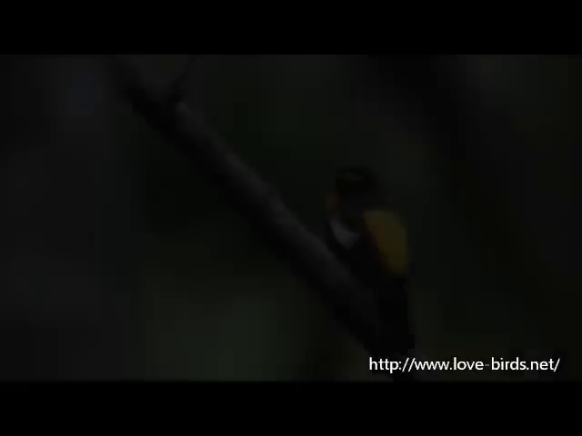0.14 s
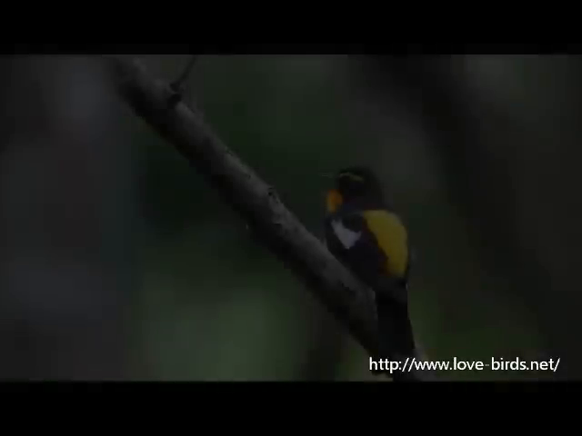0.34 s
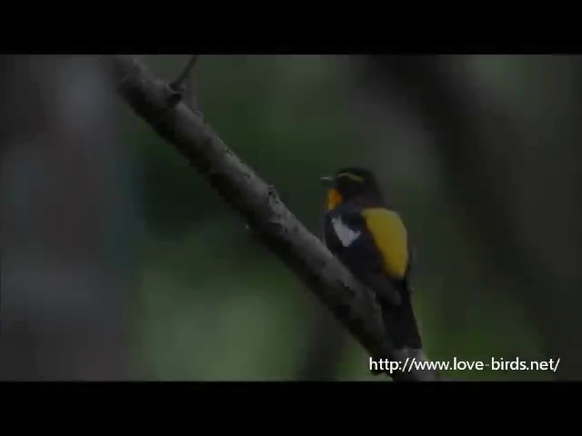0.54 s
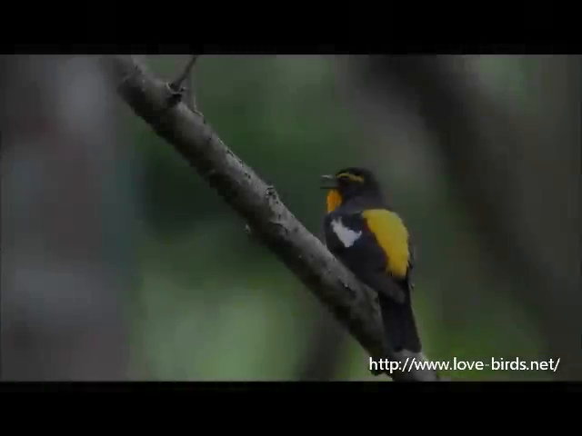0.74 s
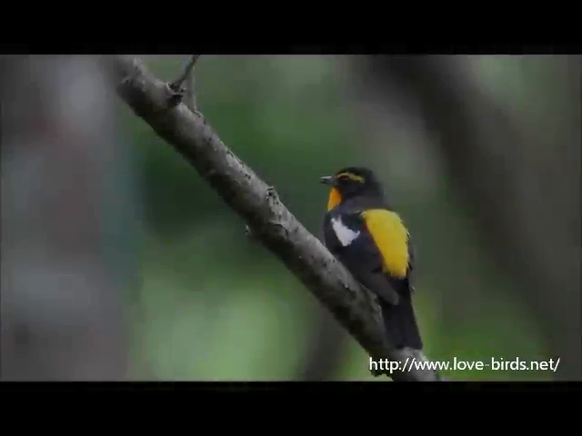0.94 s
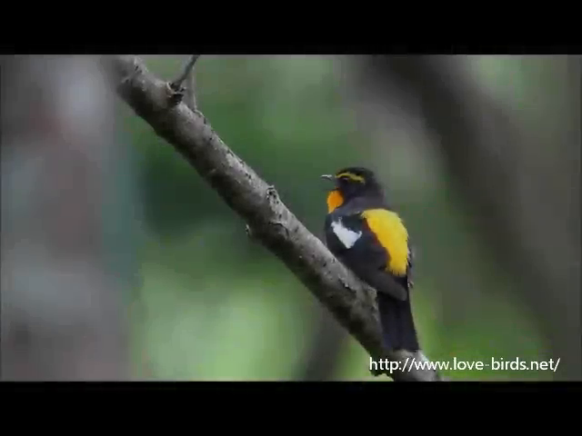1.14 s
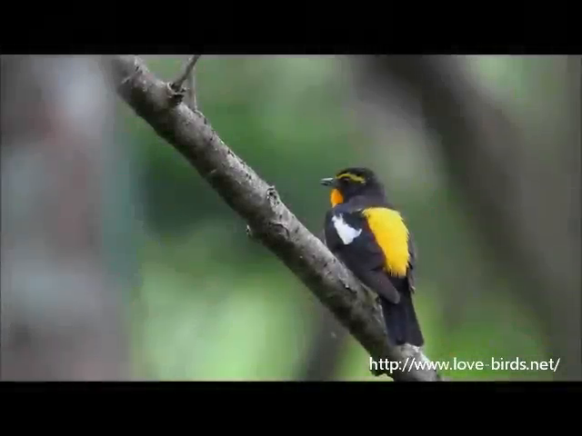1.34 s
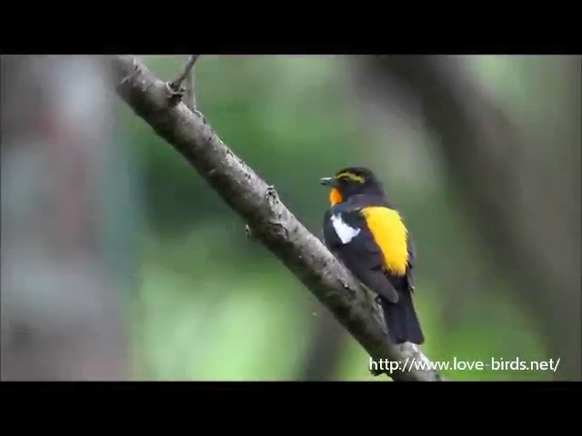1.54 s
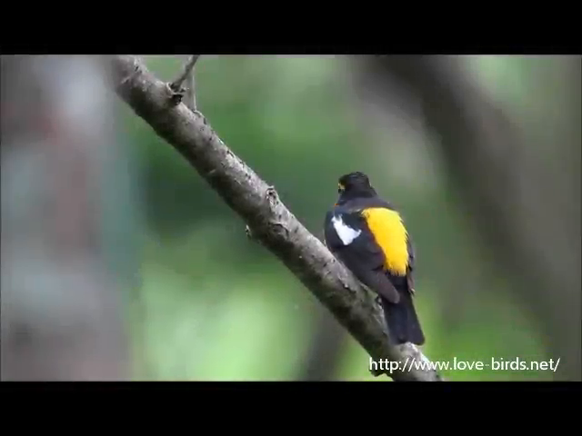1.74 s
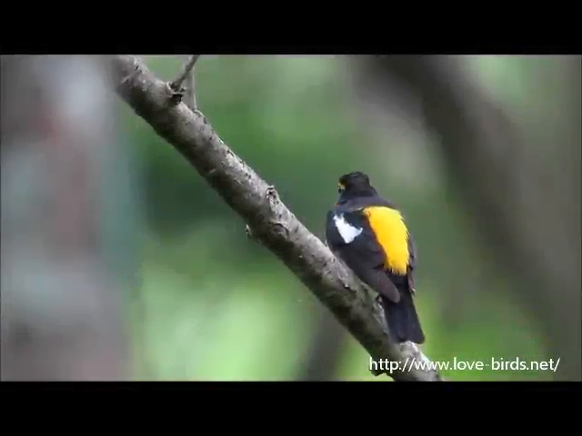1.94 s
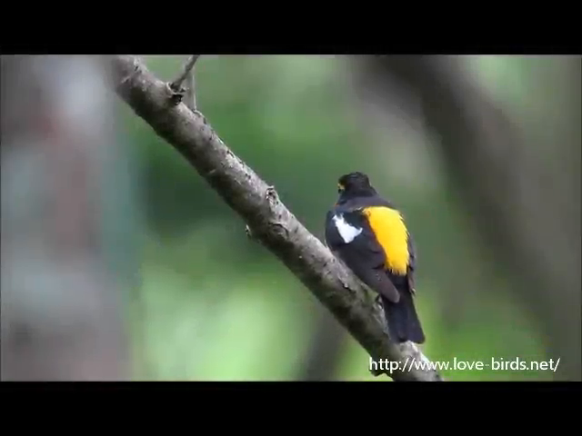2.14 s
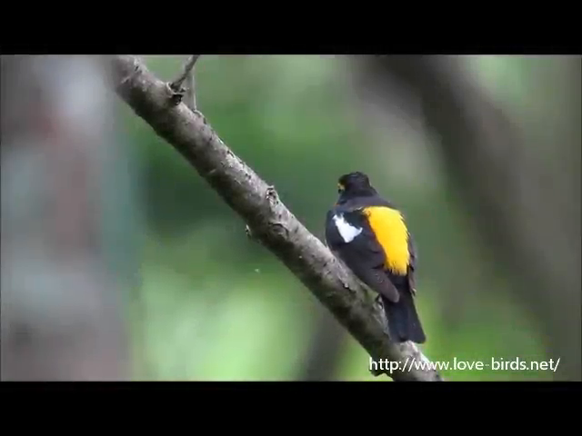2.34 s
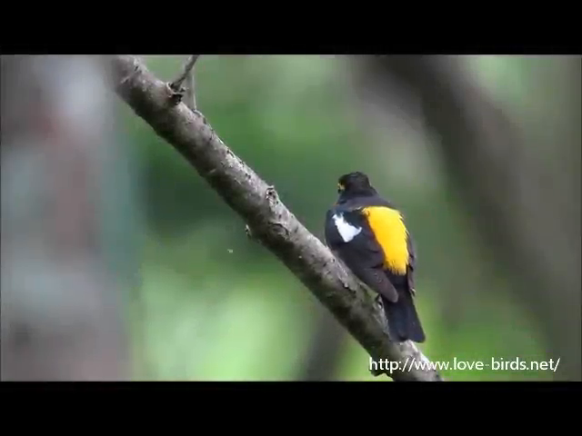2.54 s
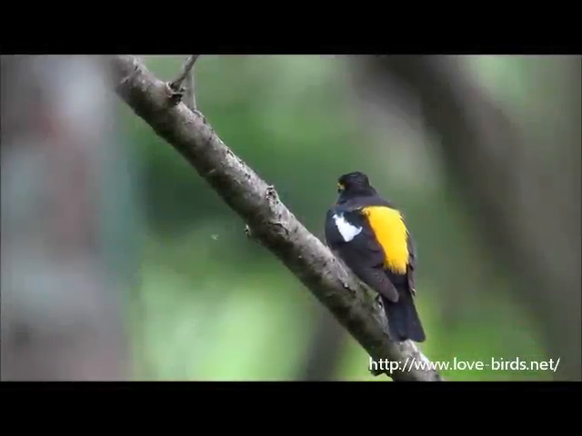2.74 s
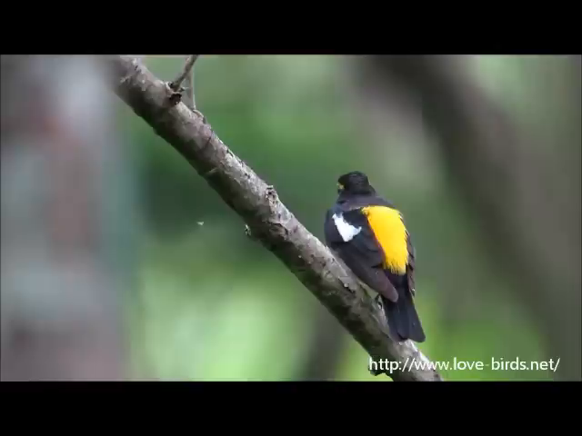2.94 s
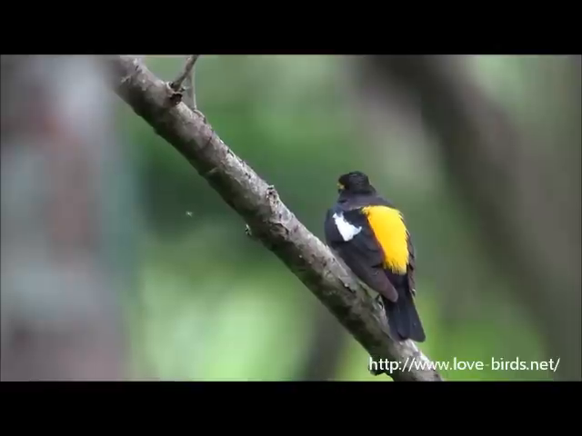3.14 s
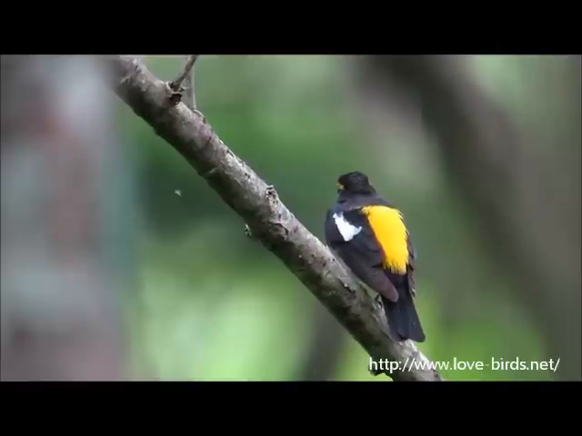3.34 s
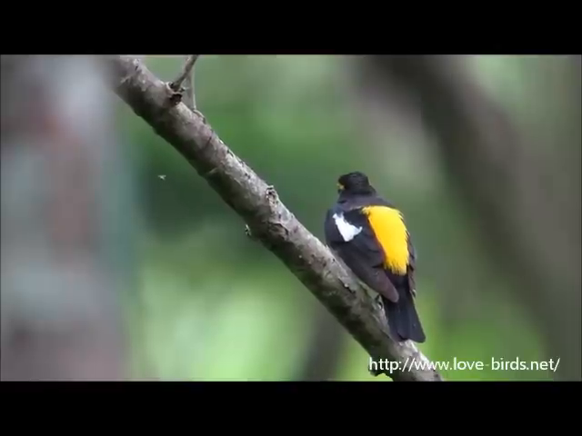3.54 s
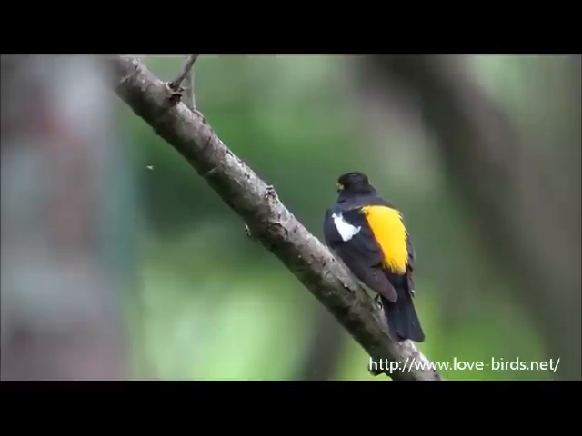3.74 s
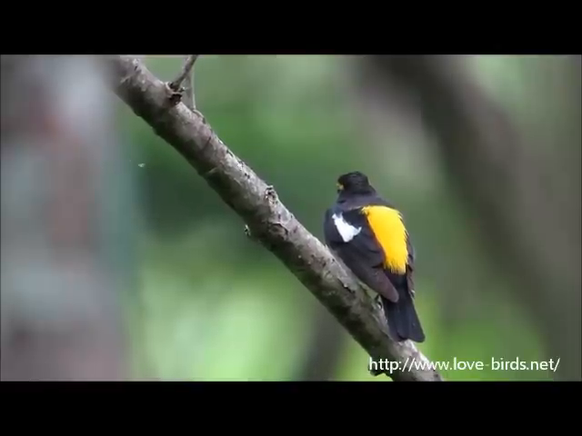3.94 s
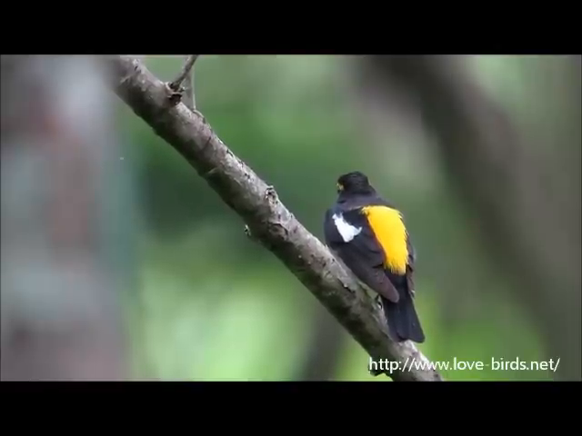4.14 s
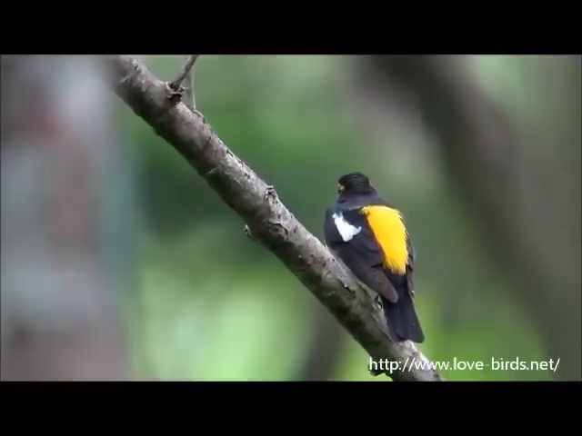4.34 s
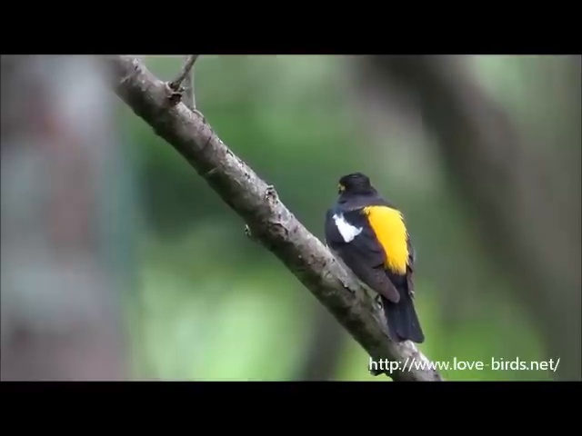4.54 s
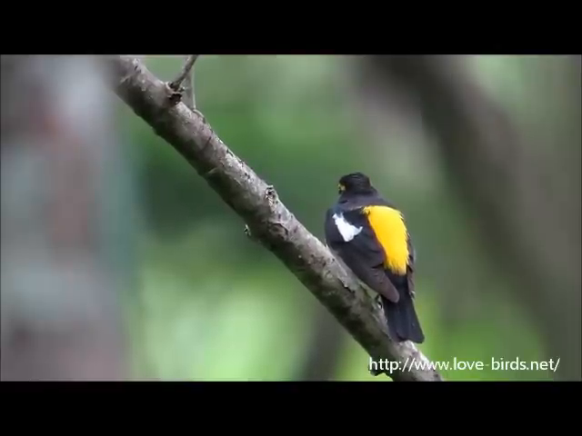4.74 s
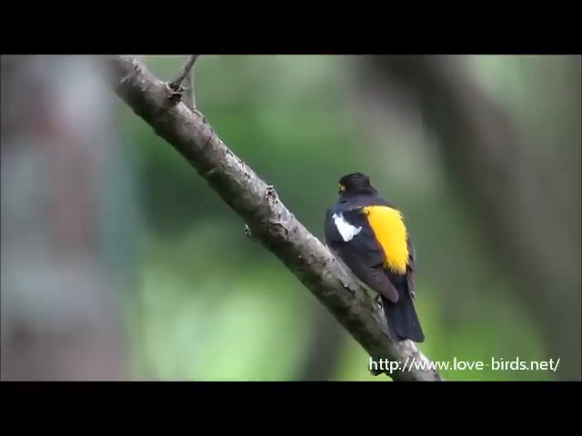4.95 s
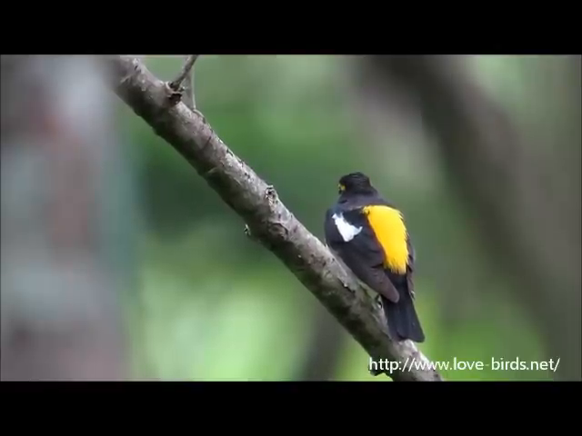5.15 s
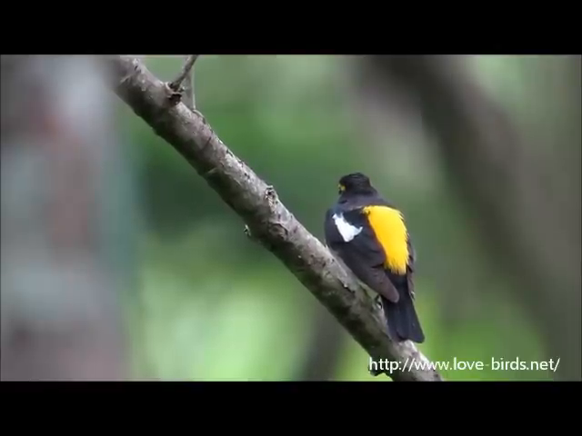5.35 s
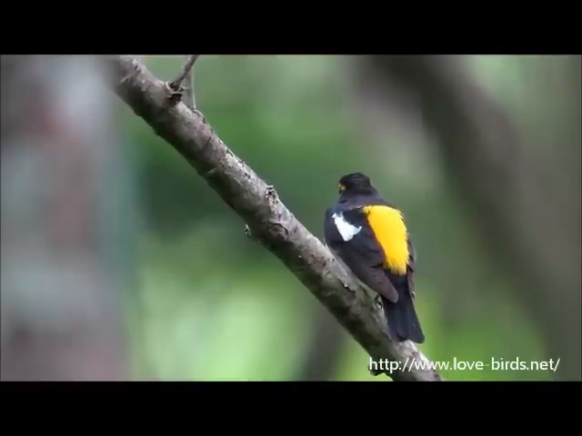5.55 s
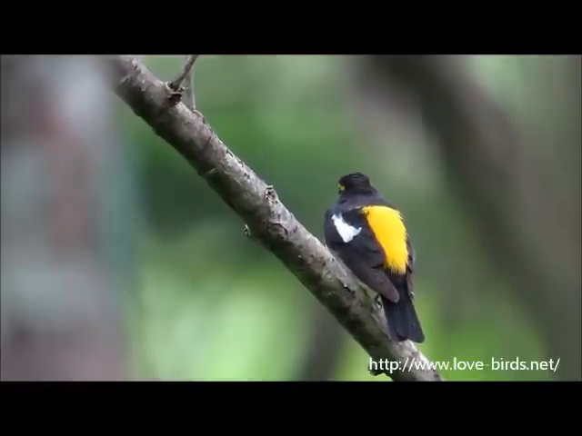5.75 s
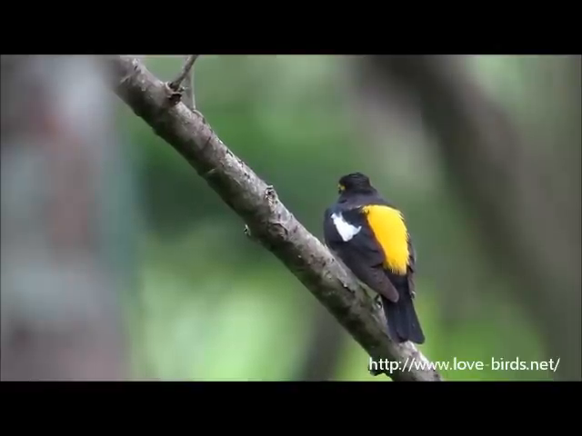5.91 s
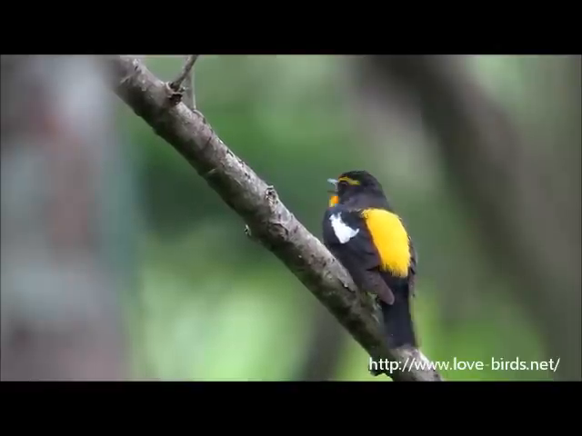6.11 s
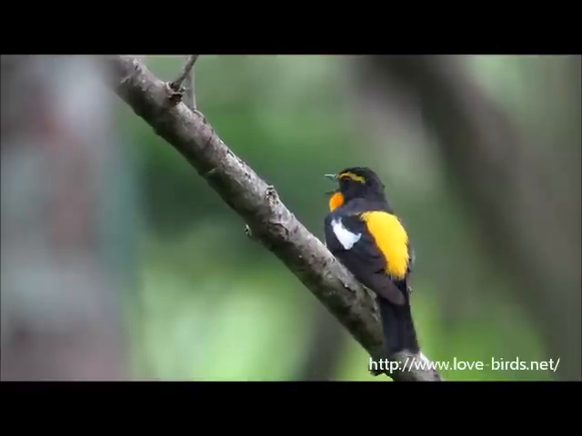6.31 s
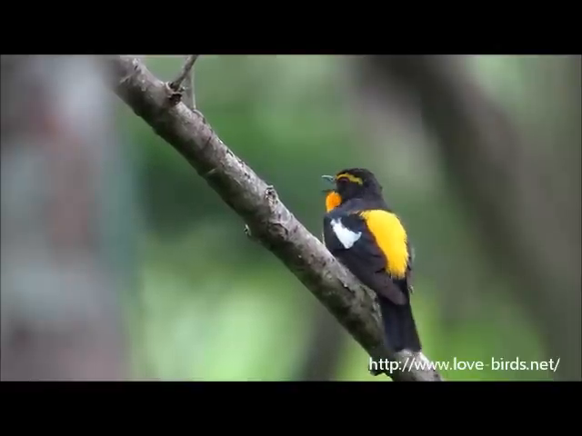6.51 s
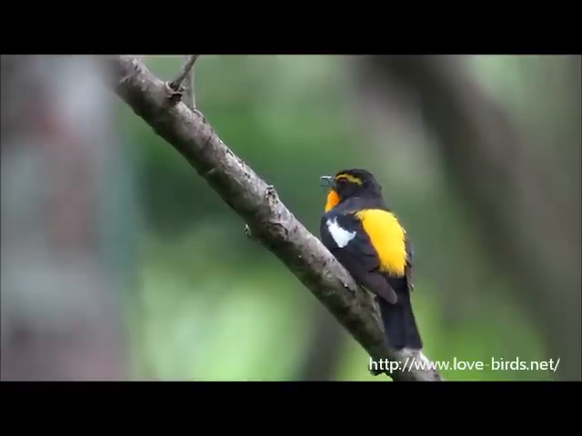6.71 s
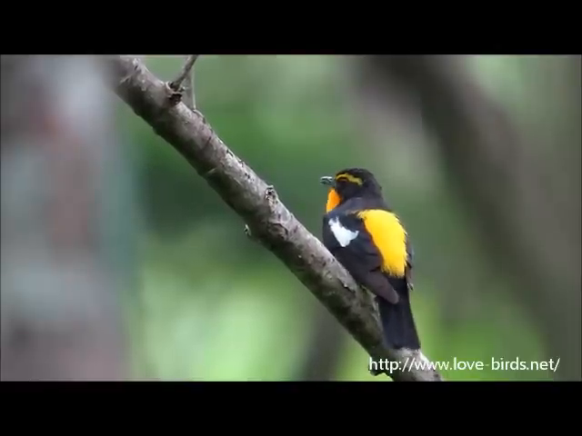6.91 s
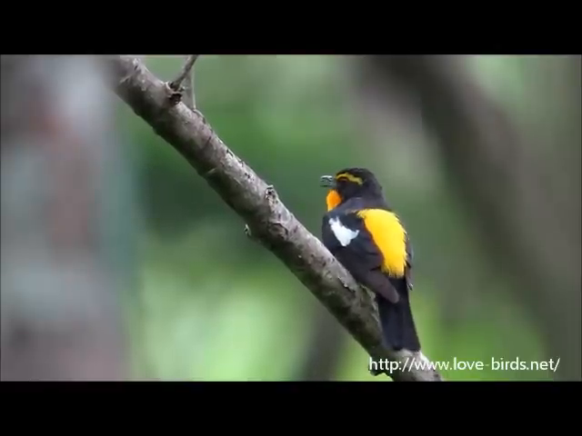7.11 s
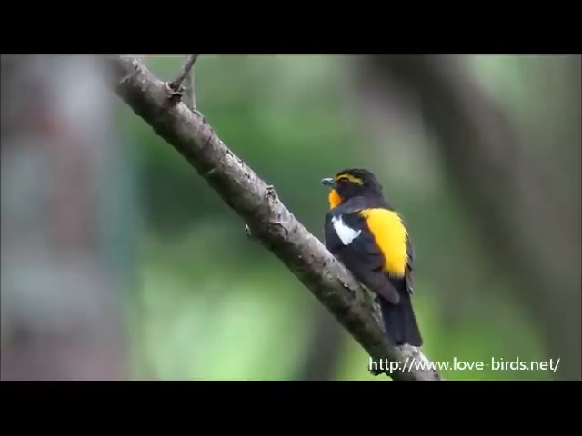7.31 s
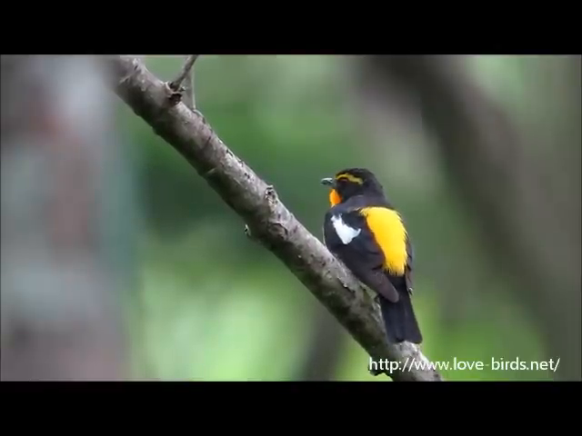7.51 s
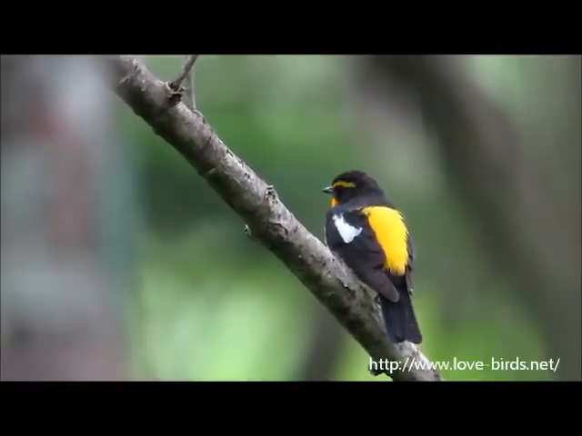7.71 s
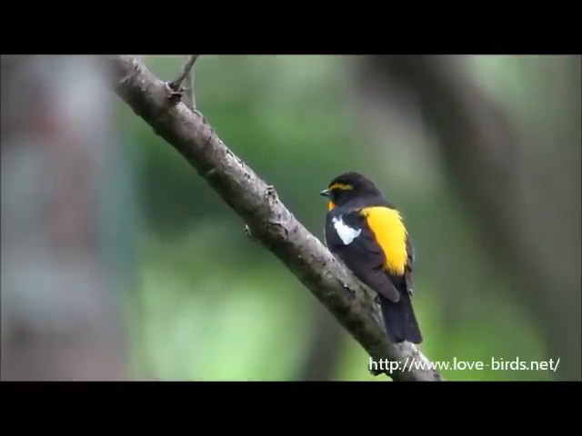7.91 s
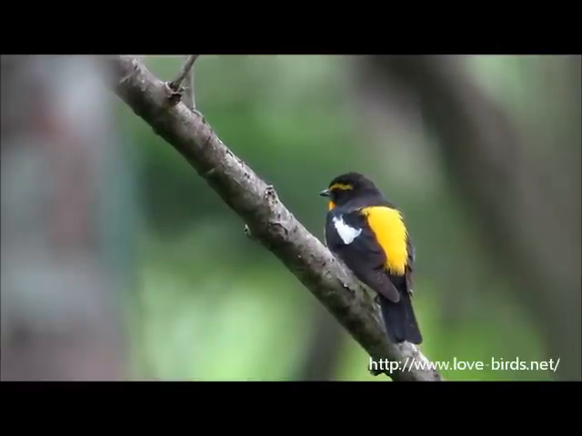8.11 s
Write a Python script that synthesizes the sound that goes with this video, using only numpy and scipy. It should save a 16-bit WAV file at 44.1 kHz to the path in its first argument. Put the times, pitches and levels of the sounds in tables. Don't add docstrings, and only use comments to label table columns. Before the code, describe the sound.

A nearby songbird sings short buzzy notes and arched whistles in an echoing forest, with fainter birds answering over soft leaf hush and a distant drone.

```python
import sys
import numpy as np
from scipy import signal
from scipy.fft import rfft, irfft, next_fast_len
from scipy.io import wavfile
from scipy.ndimage import uniform_filter1d

SR = 44100
rng = np.random.default_rng(int(sys.argv[2]) if len(sys.argv) > 2 else 0)


def file_out(sig):
    cols = np.atleast_2d(sig).T
    lim = np.clip(cols, -1, 1)
    pcm = np.round(lim * 32767).astype(np.int16)
    wavfile.write(sys.argv[1], SR, pcm)


def amp(db):
    return 10 ** (np.asarray(db, float) / 20)


N = 364707
TAIL = 3 * SR // 2


def read(points, at):
    x, value = np.transpose(points)
    return np.interp(at, x, value)


def read_hz(points, hz):
    f, value = np.transpose(points)
    return np.interp(np.log(hz + 1), np.log(f + 1), value)


def evened(x):
    return x / np.sqrt(np.mean(x ** 2) + 1e-20)


def add(mix, start_s, sound):
    part = mix[..., round(start_s * SR):][..., :sound.shape[-1]]
    part += sound[..., :part.shape[-1]]


def sides(pan_db):
    return amp(np.array([[pan_db / 2], [-pan_db / 2]]))


def fuzzy_tone(hz, width_hz):
    r = np.exp(-np.pi * width_hz / SR)
    noise = rng.standard_normal((2, N)) + 1j * rng.standard_normal((2, N))
    slow = signal.lfilter([1], [1, -2 * r, r * r], noise)
    turn = 2 * np.pi * np.cumsum(hz * np.ones(N)) / SR
    return evened((slow * np.exp(1j * turn)).real)


# frequency in Hz, level in dB per Hz.
HUSH_TONE = [(12, -30), (20, -6), (59, 2.5), (149, -4.5), (232, -1.5), (307, -6), (417, -7), (1680, -15),
             (2770, -11.5), (3280, -12.5), (4330, -10.5), (6950, -27.5), (7990, -30), (8680, -26),
             (15600, -28.5)]
# frequency in Hz, likeness from 0 to 1.
LEFT_RIGHT_LIKENESS = [(40, .45), (150, .35), (400, .4), (800, .25), (1500, .07), (15000, .1)]
# time in seconds, level in dB.
CHORUS_SWELL = [(0, -3.5), (1, -1.5), (2, -1.3), (3.2, 0.8), (4.2, 0), (5.3, -0.1), (5.8, -2), (6.3, -3.5),
                (7, 2.3), (7.7, -0.1), (8.3, -1.7)]


def hush():
    frames, hz = N // 256 + 5, np.fft.rfftfreq(1024, 1 / SR)
    a, b, c, d, patches = rng.standard_normal((frames, 513, 5)).T
    patches = uniform_filter1d(patches, size=8, axis=0)
    patches = evened(uniform_filter1d(patches, size=24, axis=1))
    patchy_db = read_hz([(300, 2.4), (1500, .8), (3000, 2.1), (7000, 1.6), (9000, 0.66)], hz)[:, None]
    chorus_band = ((hz > 2100) & (hz < 5200))[:, None]
    chorus_db = chorus_band * read(CHORUS_SWELL, np.arange(frames) * 256 / SR)
    same = np.clip(read_hz(LEFT_RIGHT_LIKENESS, hz), -1, 1)[:, None]
    left = a + 1j * b
    right = same * left + np.sqrt(1 - same ** 2) * (c + 1j * d)
    z = np.array([left, right])
    z *= amp(read_hz(HUSH_TONE, hz)[:, None] + patchy_db * patches + chorus_db)
    return amp(-51.5) * evened(signal.istft(z, nperseg=1024, noverlap=768)[1][:, :N])


# time in seconds, pitch in Hz, level in dB.
AIRCRAFT = [(0, 320, -69.5), (2.601, 302, -61), (3.699, 265, -61.5), (4.299, 238, -74), (5.798, 222, -63.5),
            (8.3, 200, -57.5)]


def drone():
    s, hz, level_db = np.transpose(AIRCRAFT)
    t = np.arange(N) / SR
    pitch = np.interp(t, s, hz)
    blades = fuzzy_tone(pitch, 30)
    octave = amp(-5) * fuzzy_tone(2 * pitch, 79)
    return amp(np.interp(t, s, level_db)) * (blades + octave)


# frequency in Hz, width in Hz, level in dB.
ELECTRONIC_WHINES = [
    (8794, 40, -65.5),
    (15700, 15, -110),
]


def whines():
    return sum(amp(db) * fuzzy_tone(hz, width_hz) for hz, width_hz, db in ELECTRONIC_WHINES)


# start in seconds, peak in dB, left-right difference in dB.
CAMERA_TICKS = [(0.2394, -85, 1.0), (0.3674, -75, -0.5), (0.882, -54, -11), (1.0346, -63, -2.5),
                (1.263, -47, -8), (1.4207, -55, -2.0), (1.644, -48, -10), (1.8, -54, -2.5),
                (2.0552, -49, -6), (2.2134, -55, -3.5), (2.4349, -47, -8), (2.5933, -52, -6),
                (2.7356, -58, -6), (2.7615, -46, -8), (2.8215, -54, -5), (4.5326, -44, 2)]


def ticks():
    out, t = np.zeros((2, N)), np.arange(2200) / SR
    bright = signal.butter(1, (5000, 12500), "band", fs=SR, output="sos")
    noises = rng.standard_normal((len(CAMERA_TICKS), 2, 2200))
    for (s, peak_db, pan_db), noise in zip(CAMERA_TICKS, noises):
        burst = signal.sosfilt(bright, noise[0] + 0.44 * noise)
        add(out, s, sides(pan_db) * amp(peak_db + 0.5 - 60 * t / 0.022) * burst)
    return out


def whistle(depth_hz, rows, overtone_db, waver):
    s, hz, level_db = np.transpose(rows)
    t = np.arange(s[0], s[-1], 1 / SR)
    drift, flutter = evened(uniform_filter1d(rng.standard_normal((2, SR)), size=400))[:, :len(t)]
    warble_hz = max(75, .25 * depth_hz)
    swing = np.sin(2 * np.pi * np.cumsum(warble_hz * (1 + 0.1215 * drift)) / SR)
    glide = uniform_filter1d(np.interp(t, s, hz), size=200, mode="nearest")
    pitch = glide * (1 + waver * drift) + depth_hz * swing
    turn = 2 * np.pi * np.cumsum(pitch) / SR
    edge = np.clip(np.minimum(t - s[0], s[-1] - t) / 0.0042, 0, 1)
    gain = np.sqrt(2) * amp(np.interp(t, s, level_db) + 1.74 * flutter) * edge
    overtones = amp(overtone_db) * np.sin(2 * turn) + amp(overtone_db + 2) * np.sin(3 * turn)
    return gain * (np.sin(turn) + overtones)


# frequency in Hz, time to fall by 60 dB in seconds.
ECHO_TIME = [(2000, 0.57), (3500, 0.55), (5000, 0.47), (8000, 0.65)]


def forest(build_s):
    taps = np.zeros((3, 2, TAIL))
    at = np.arange(40, TAIL - 20, 20) + rng.integers(0, 20, (3, 2, (TAIL - 41) // 20))
    np.put_along_axis(taps, at, rng.choice([-1., 1.], at.shape), axis=2)
    taps *= 1 - np.exp(-np.arange(TAIL) / SR / build_s)
    hz, t, z = signal.stft(taps, SR, nperseg=256)
    fall_db = -60 * t / read_hz(ECHO_TIME, hz)[:, None]
    far_slopes = amp(-12 + fall_db / 2.62)
    tails = signal.istft(z * (amp(fall_db) + far_slopes), SR, nperseg=256)[1]
    song_band = signal.butter(2, (2500, 5000), "band", fs=SR, output="sos")
    return tails / np.linalg.norm(signal.sosfilt(song_band, tails[0, 0])) / 3


def birds(notes, tails, direct_db, echo_db, overtone_db, waver):
    paths, size = np.zeros((3, 2, N)), next_fast_len(N + 2 * TAIL, True)
    for k, (pan_db, depth_hz, rows) in enumerate(notes):
        add(paths[k % 3], rows[0][0], sides(pan_db) * whistle(depth_hz, rows, overtone_db, waver))
    direct = paths.sum(0)
    direct[1] = np.roll(direct[1], 2)
    echo = irfft((rfft(paths, size) * rfft(tails, size)).sum(0), size)[:, :N]
    return amp(direct_db) * direct + amp(echo_db) * echo


# left-right difference in dB, warble depth in Hz,
# then the note's points, each a time in seconds, pitch in Hz, level in dB.
FLYCATCHER_NOTES = [ (5.4, 588, [(.257, 3820, -38.5), (.28, 3830, -33), (.34, 3800, -46)]),
                    (4.2, -6, [(.285, 3606, -33), (.305, 3723, -25), (.345, 3683, -24), (.375, 3740, -30)]),
                    (5, 770.5, [(.358, 4150, -27), (.39, 4020, -25.5), (.45, 4000, -30), (.55, 3950, -33),
                    (.7, 3850, -42)]), (4.6, 200, [(.415, 5300, -48), (.46, 5350, -50)]),
                    (2.4, 19, [(.865, 1886, -54), (.885, 3164, -26.5), (.91, 3260, -29.5), (.95, 3296, -29),
                    (.965, 2800, -34), (.985, 2070, -47)]), (1.4, 57, [(1.08, 1817, -50),
                    (1.105, 2350, -35), (1.13, 2520, -32), (1.16, 2450, -46), (1.175, 2200, -38),
                    (1.19, 1850, -57)]), (1.5, 0, [(1.25, 2366, -50), (1.265, 3275, -23), (1.29, 3418, -30),
                    (1.325, 3412, -22.5), (1.345, 2800, -37), (1.36, 2070, -53)]),
                    (3.5, 4, [(6.255, 3400, -46), (6.28, 3550, -23.5), (6.295, 3800, -23),
                    (6.308, 4280, -18), (6.32, 4890, -39)]), (8.2, 389, [(6.32, 4357, -23),
                    (6.37, 4150, -26), (6.44, 4115, -30), (6.49, 4100, -30)]),
                    (5, 52.5, [(6.34, 3550, -34.5), (6.38, 3680, -28), (6.44, 3763, -26.5),
                    (6.5, 3780, -38)]), (7.8, 54.5, [(6.55, 3750, -32.5), (6.59, 3800, -25),
                    (6.65, 3780, -33.5), (6.72, 3780, -43.5)]), (6, 396.5, [(6.525, 4500, -33.5),
                    (6.56, 4238, -23.5), (6.65, 4176, -31.5), (6.72, 4150, -34)]),
                    (3, -2, [(6.527, 4647, -23), (6.545, 4480, -21), (6.6, 4436, -31.5)]),
                    (2.6, -17, [(6.868, 1876, -50.5), (6.887, 3100, -31), (6.91, 3250, -28.5),
                    (6.952, 3320, -25), (6.965, 2890, -33), (6.99, 2150, -46)]),
                    (1.2, 68, [(7.08, 1766, -46), (7.105, 2263, -40), (7.135, 2420, -40),
                    (7.16, 2380, -39.5), (7.175, 2150, -47), (7.19, 1850, -45)]),
                    (1.3, 25, [(7.24, 2065, -52), (7.257, 3150, -26.5), (7.275, 3290, -26.5),
                    (7.322, 3290, -31), (7.335, 2800, -33.5), (7.355, 2100, -41)]), ]


def flycatcher(tails):
    return birds(FLYCATCHER_NOTES, tails, -8.0, -3.33, -46.5, waver=0.0031)


# left-right difference in dB, warble depth in Hz,
# then the note's points, each a time in seconds, pitch in Hz, level in dB.
FAR_NOTES = [ (0, 120, [(1.97, 2497, -56), (2.1, 2170, -57), (2.25, 1910, -62.5), (2.42, 1967, -62)]),
             (0, 200, [(2.02, 4920, -60), (2.1, 4460, -58), (2.18, 4470, -72)]), (0, 0, [(2.1, 3700, -61),
             (2.2, 3730, -68)]), (0, -2, [(2.27, 5700, -61), (2.33, 4600, -51), (2.37, 4300, -49.5),
             (2.45, 4205, -55)]), (0, 0, [(2.42, 7700, -62), (2.46, 7650, -55), (2.49, 7000, -60)]),
             (0, 0, [(2.58, 7950, -58), (2.62, 7360, -60), (2.65, 6860, -62)]), (0, 0, [(2.73, 7830, -56),
             (2.78, 7300, -62), (2.81, 6900, -67)]), (0, 73, [(2.585, 3430, -51), (2.65, 3360, -61)]),
             (0, 0, [(2.715, 3380, -51), (2.77, 3450, -61)]), (0, 152, [(2.75, 2500, -56), (2.8, 2150, -57),
             (2.9, 1967, -52.5)]), (0, -3, [(2.88, 4870, -55), (2.92, 4270, -48), (2.95, 3450, -51)]),
             (0, 96, [(3.1, 3400, -55), (3.2, 3250, -60.5), (3.3, 3284, -55)]), (0, 150, [(3.28, 2500, -56),
             (3.33, 2110, -53.5), (3.45, 1950, -56)]), (1, -3, [(3.405, 6300, -54.5), (3.46, 6150, -52.5)]),
             (1, 403.5, [(3.47, 4450, -46), (3.55, 4400, -54), (3.64, 4400, -62)]),
             (0, 400, [(.78, 5600, -61), (.84, 5000, -58), (.95, 4500, -62)]), (0, 900, [(3.12, 10600, -69),
             (3.25, 10500, -64), (3.35, 10400, -74)]), (1, 0, [(3.462, 4080, -54), (3.47, 5020, -46),
             (3.52, 5000, -47), (3.62, 4970, -63)]), (1, 300, [(3.68, 4300, -46), (3.72, 4700, -42),
             (3.76, 4960, -47)]), (1, -13, [(3.72, 5020, -40), (3.76, 5240, -53), (3.88, 5265, -44)]),
             (0, 152, [(3.87, 2450, -51), (3.92, 2145, -57), (4.03, 1920, -58)]),
             (4, 72, [(3.89, 4850, -38), (3.92, 4340, -39), (3.96, 4127, -36.5), (4.05, 4066, -40.5),
             (4.13, 3890, -44.5), (4.22, 3960, -49.5)]), (1, 0, [(3.93, 7160, -48), (3.95, 6870, -53),
             (3.99, 6800, -70)]), (1, 200, [(4.03, 7260, -57), (4.12, 6900, -61), (4.2, 6780, -56)]),
             (1, 4, [(3.98, 2850, -35.5), (3.992, 3400, -49), (4.0, 3330, -62), (4.04, 3280, -57)]),
             (1, 50, [(4.13, 2950, -40), (4.19, 3070, -56), (4.28, 2930, -55)]), (1, 0, [(4.28, 3945, -37),
             (4.295, 3397, -44.5), (4.32, 3270, -43)]), (1, 19, [(4.28, 5065, -52), (4.36, 4850, -54)]),
             (0, 306, [(4.33, 8800, -53), (4.36, 9140, -66), (4.42, 9000, -62)]),
             (0, 205, [(3.63, 8500, -62), (3.7, 8500, -63)]), (4, 5, [(4.42, 6280, -57),
             (4.45, 6080, -44.5), (4.475, 5180, -42.5), (4.52, 4760, -42.5), (4.6, 4650, -40.5),
             (4.68, 4530, -52)]), (4, 62, [(4.52, 3520, -43), (4.54, 3630, -37), (4.59, 3690, -35),
             (4.63, 3464, -47)]), (4, 697, [(4.69, 4476, -46), (4.73, 4250, -36), (4.77, 4180, -45.5),
             (4.9, 4095, -41.5)]), (4, -17, [(4.77, 3846, -29), (4.8, 3820, -42.5), (4.88, 3770, -47.5),
             (5.05, 3770, -47.5)]), (0, 28, [(4.67, 7680, -56), (4.75, 7700, -65), (4.85, 7840, -56)]),
             (2, 72, [(4.89, 3440, -58), (4.96, 3370, -45.5), (5.05, 3400, -51)]),
             (2, 81, [(4.89, 2736, -49.5), (5.05, 2860, -61)]), (2, 0, [(5.14, 3576, -37.5),
             (5.2, 3620, -45), (5.26, 3580, -50)]), (2, 6, [(5.155, 5300, -50), (5.18, 5460, -39.5),
             (5.22, 5520, -52), (5.27, 5340, -67)]), (2, 0, [(5.3, 4047, -48), (5.4, 3944, -47.5),
             (5.46, 3930, -46)]), (2, 203, [(5.31, 3665, -37), (5.38, 3530, -47), (5.42, 3600, -51)]),
             (0, -2, [(5.34, 4810, -47), (5.42, 5020, -55)]), (0, 100, [(5.42, 2450, -58),
             (5.47, 2163, -52)]), (2, 0, [(5.46, 3725, -37), (5.56, 3727, -56), (5.8, 3750, -65.5)]),
             (1, 1, [(5.59, 3550, -49), (5.61, 3050, -51), (5.632, 2610, -50)]),
             (0, -5, [(5.57, 7800, -52.5), (5.66, 7930, -71)]), (0, -4, [(5.9, 7650, -62), (6.0, 7580, -67),
             (6.04, 7100, -68)]), (0, 0, [(6.06, 7700, -57), (6.12, 7260, -61), (6.19, 7020, -61)]),
             (1, 195, [(6.18, 5030, -54), (6.22, 4670, -42.5), (6.27, 4130, -45)]),
             (1, 119, [(6.68, 7370, -57), (6.74, 6700, -59), (6.88, 6550, -57)]),
             (1, 205, [(6.99, 6340, -55), (7.1, 6060, -61), (7.2, 6270, -50)]), (1, 3, [(7.03, 6000, -46),
             (7.05, 5670, -61), (7.15, 5700, -61)]), (1, 7, [(7.28, 1730, -54), (7.34, 1650, -63)]),
             (1, 152, [(7.48, 7240, -57.5), (7.55, 6770, -62), (7.68, 6490, -58)]),
             (2, -6, [(7.8, 5000, -53), (7.85, 4950, -55), (7.93, 5010, -55), (8.01, 4970, -54),
             (8.25, 5000, -69)]), (2, 3, [(7.83, 4220, -51), (7.88, 4265, -53.5), (8.1, 4180, -58),
             (8.26, 4180, -67)]), ]


def far_birds(tails):
    return birds(FAR_NOTES, tails[::-1, ::-1], -10.5, -3.03, -55, waver=0.0049)


# start in seconds, peak in dB.
DULL_KNOCKS = [
    (2.487, -40),
    (2.512, -47.5),
    (2.663, -43.5),
]
# frequency in Hz, level in dB, time to fall by 60 dB in seconds.
KNOCK_RING = [
    (780, -0.5, 0.032),
    (1340, -6, 0.033),
    (2800, -3, 0.02),
]


def knocks():
    out, t = np.zeros((2, N)), np.arange(2200) / SR
    ring = sum(amp(db - 60 * t / t60) * np.sin(2 * np.pi * hz * t) for hz, db, t60 in KNOCK_RING)
    for s, peak_db in DULL_KNOCKS:
        add(out, s, amp(peak_db) * ring[None])
    return out


def scene():
    tails = forest(0.0013)
    camera = whines() + ticks() + knocks()
    return hush() + drone() + camera + flycatcher(tails) + far_birds(tails)


# frequency in Hz, dB added to the hearing limit.
MASKING_EXTRA = [(4850, -40), (5050, 0), (7000, 5), (8300, 12), (8700, 7), (12000, 14), (16000, 15)]


def masked(x):
    hz, t, z = signal.stft(x, SR, nperseg=2048, noverlap=1024)
    power = abs(z[:, :1024]) ** 2
    bands = uniform_filter1d(power.reshape(2, 128, 8, -1).mean(2), size=2)
    centre = hz[4:1024:8]
    octaves = np.log2(centre[:, None] / centre)
    spread = amp(2 * (-27 - 36 * octaves)) * (octaves > 0)
    quiet_limit = amp(2 * -109)
    limit = spread @ bands * amp(2 * read(MASKING_EXTRA, centre))[:, None] + quiet_limit
    z[:, :1024] *= np.repeat(bands > limit, 8, axis=1)
    return signal.istft(z, SR, nperseg=2048, noverlap=1024)[1][:, :N]


def low_pass(x):
    return signal.sosfilt(signal.butter(12, 15740, fs=SR, output="sos"), x)


# frequency in Hz, level in dB.
OVERALL_TONE = [(7300, 0.5), (7900, -7), (8200, -13), (8500, -14.5), (8700, -13.5), (9100, -1.5),
                (15760, -1.5), (15860, -71)]
# time in seconds, level in dB.
FADE_IN = [(.09, -80), (.12, -35), (.18, -20.5), (.29, -18), (.42, -16), (.67, -11), (.86, -7.5), (1.5, -3),
           (1.9, -0.5), (2.6, 3), (3, 2.5)]


def record(dry):
    hz = np.linspace(0, SR / 2, 1025)
    taps = signal.firwin2(1023, hz, amp(read(OVERALL_TONE, hz)), fs=SR, window=("kaiser", 8))
    coloured = signal.oaconvolve(dry, taps[None], "same", axes=1)
    fade = amp(read(FADE_IN, np.arange(N) / SR))
    return low_pass(masked(coloured) * fade)


dry = scene()
out = record(dry)
file_out(out)
```